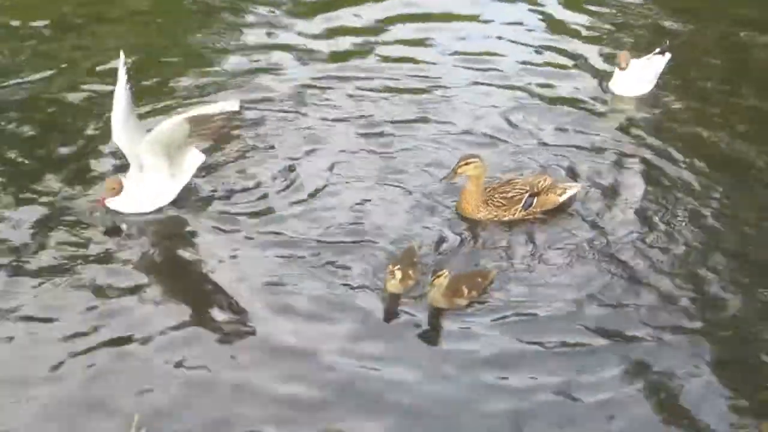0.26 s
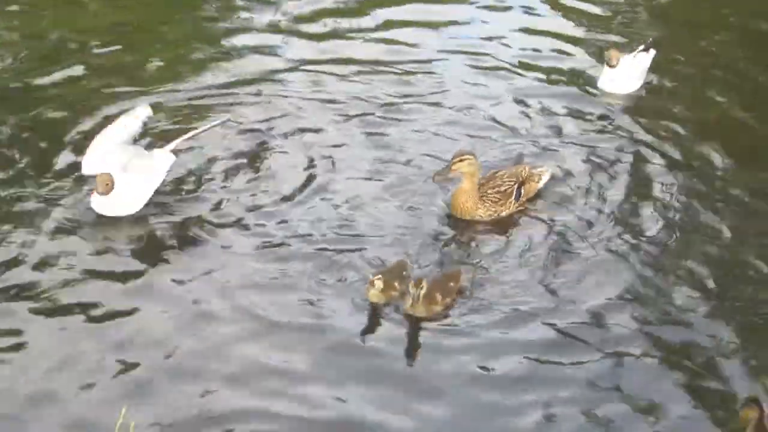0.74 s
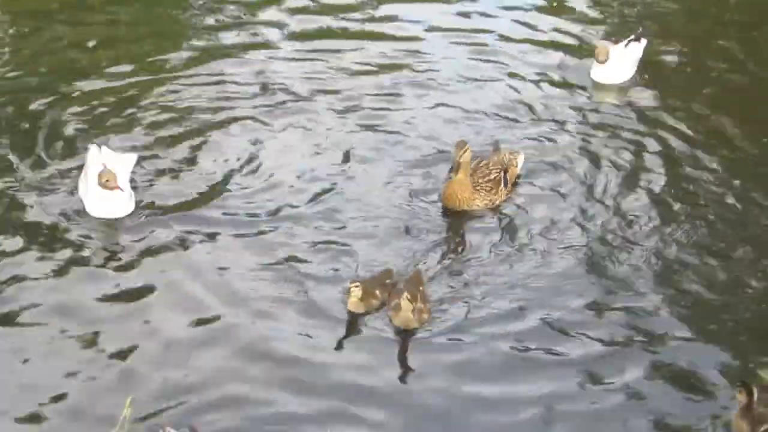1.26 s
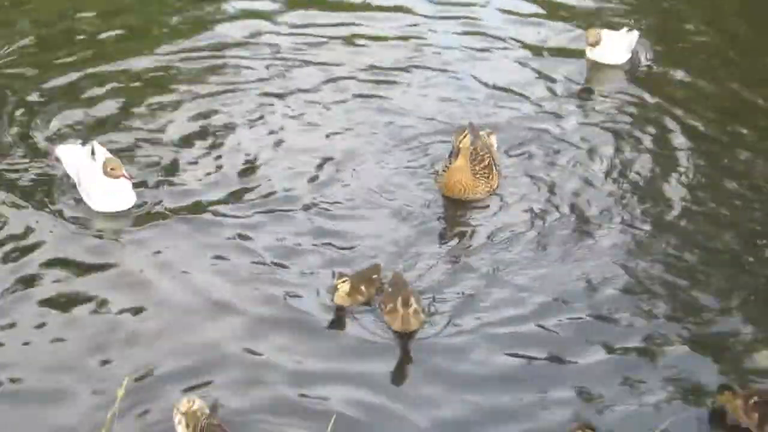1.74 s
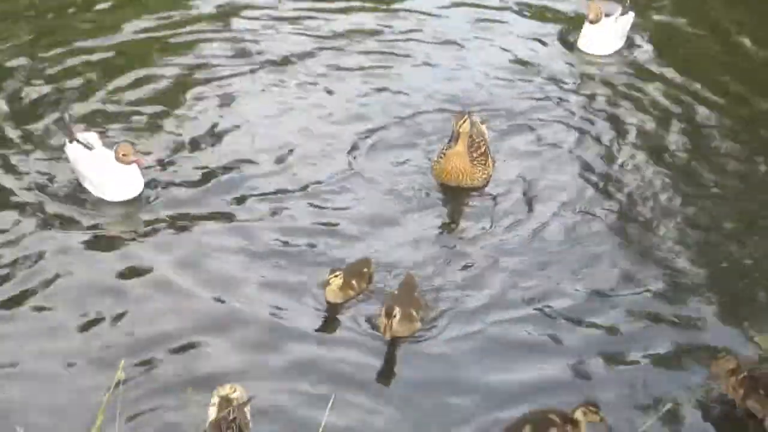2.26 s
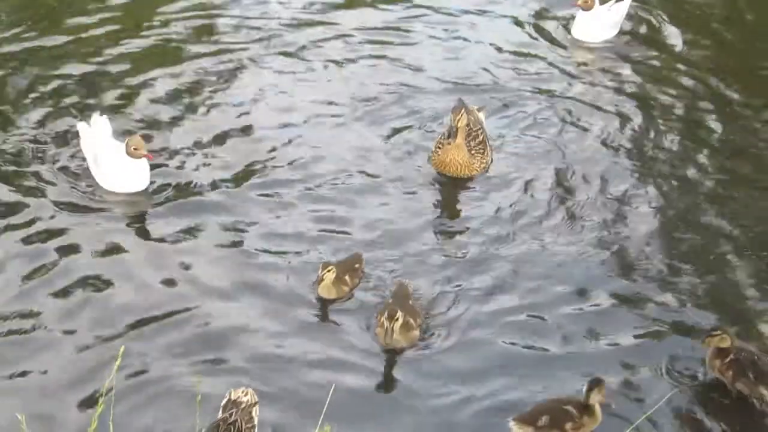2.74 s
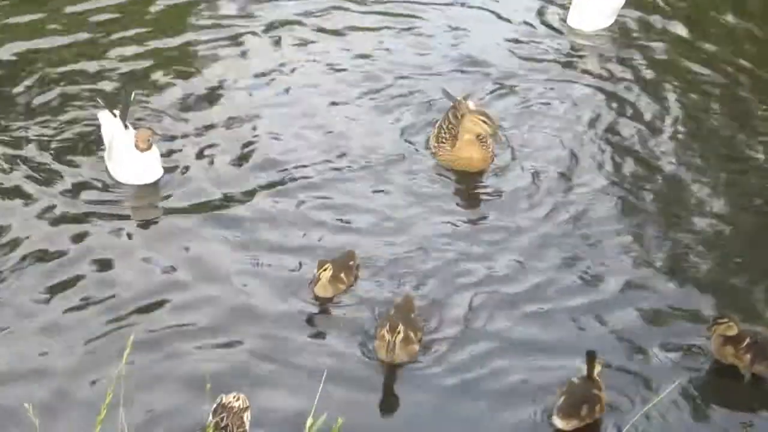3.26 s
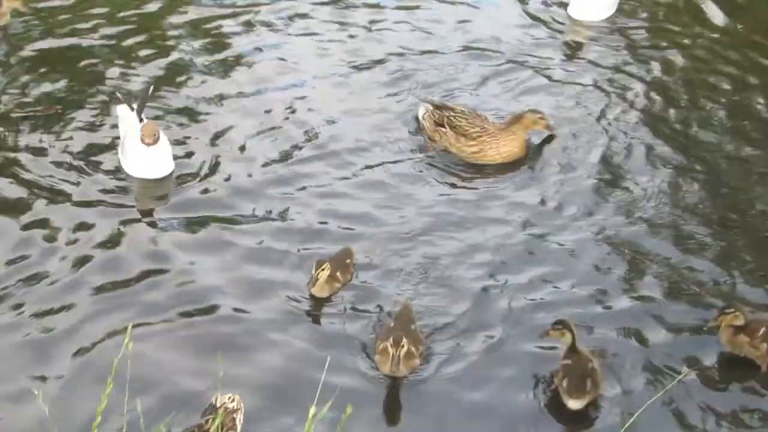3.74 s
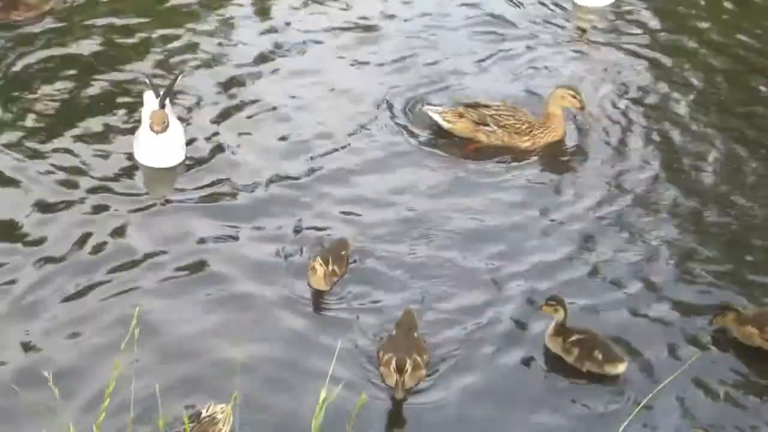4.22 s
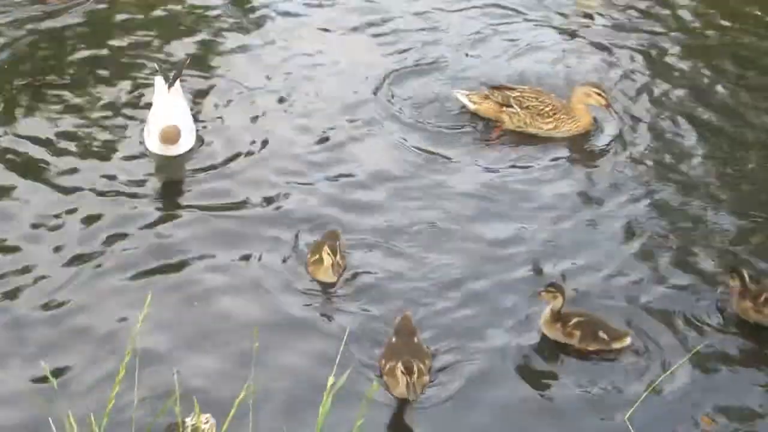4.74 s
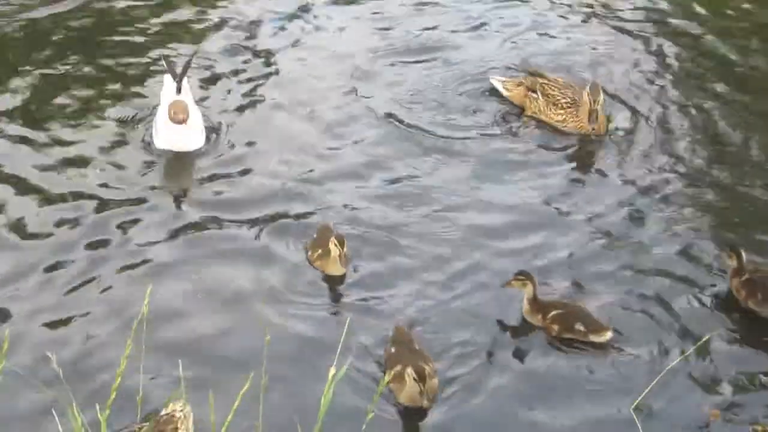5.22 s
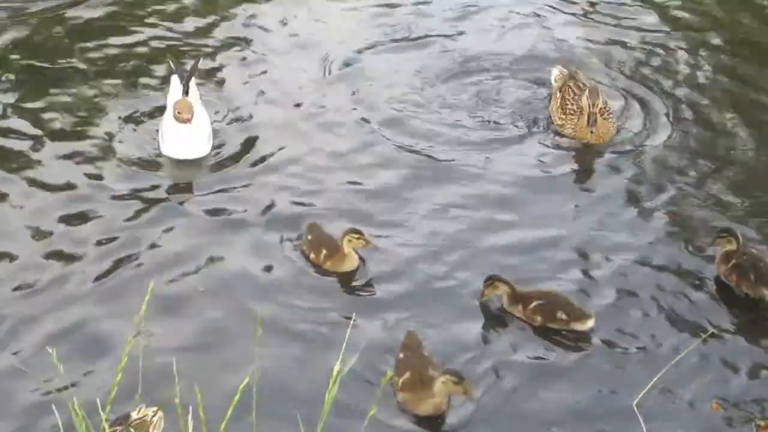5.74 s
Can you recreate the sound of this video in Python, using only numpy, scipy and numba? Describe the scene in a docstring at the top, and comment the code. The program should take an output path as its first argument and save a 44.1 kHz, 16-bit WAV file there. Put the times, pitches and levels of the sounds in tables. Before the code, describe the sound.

Ducks close by keep up a dense, low clucking chatter on a pond, with two clear quacks, small splashes and a soft outdoor rumble.

```python
"""On a pond bank, mallards and their ducklings crowd close to the microphones, with a few gulls among them.
Near and far ducks cluck in hums and rattling pulses that ring in throat and bill; two open-billed quacks stand out.
Gulls squawk in rough pulse tones and ducklings peep in gliding whistles; bills and feet stir the water in noise,
with sharp splats and rising drips. Behind lie a flock murmur, dull echoes and a low outdoor rumble in shaped noise.
Low thumps of wind strike the microphones midway and near the end, where gusts of a breeze join them."""
import sys
import numpy as np
from scipy import signal
from scipy.io import wavfile
from numba import njit

SR = 44100
rng = np.random.default_rng(int(sys.argv[2]) if len(sys.argv) > 2 else 0)


def unload_audio(sound):
    """Save the sound as a 16-bit wav file, at the path given as the first command line argument."""
    columns = np.transpose(np.atleast_2d(sound))
    # keep every value between -1 and 1, then stretch to whole-number steps
    steps = np.round(np.clip(columns, -1, 1) * 32767)
    wavfile.write(sys.argv[1], SR, steps.astype(np.int16))


N = 263718

# Levels in the tables are ahead of each layer's trim, placing and filtering.
# Clucks of the near ducks: (start [s], length [s], hum pitch [Hz], throat level [dB], throat resonance [Hz],
# hum re throat [dB], bill re throat [dB], direction [-1 left to 1 right])
NEAR_CLUCKS = [(0.047, .06, 307, -31.5, 2060, -6, -1, 0.18), (.16, 0.037, 339, -26.5, 2100, -9, -15, 0.88),
               (0.261, .042, 342, -29, 1580, -5.5, -2.5, 0), (0.417, 0.036, 305, -35, 1780, -5, -13, -0.57),
               (0.461, .032, 298, -35, 1320, -10, -27, -0.37),
               (.531, 0.051, 335.4, -25.5, 1920, -6.5, 0.5, -0.31),
               (0.56, 0.061, 299, -29.5, 2010, -16, 3, -0.37),
               (0.632, 0.033, 339.5, -35.5, 1950, -6, -5, -.8),
               (0.775, .031, 333, -38.5, 1980, -1, -19, -0.43),
               (0.896, .046, 313, -34.5, 1860, -7.5, -18, -0.65),
               (1.02, 0.067, 306, -31, 1620, -9, -2, -0.13),
               (1.083, 0.035, 347, -22.5, 1840, -12.5, -17, 0.53),
               (1.155, 0.051, 321, -34, 1690, -10, -25, .5), (1.199, 0.033, 299, -27.5, 1950, -8.5, -5, 0),
               (1.277, 0.052, 278, -34.5, 1640, -10, -9, -0.54),
               (1.352, 0.049, 383.3, -24, 2050, -11.5, -9.5, 0.5),
               (1.692, 0.059, 392, -28.5, 2080, -10.5, -13.5, .6),
               (1.763, 0.029, 335, -27.5, 2010, -15.5, -11.5, 0.73),
               (1.806, 0.045, 281, -36.5, 1630, -11, -9, -0.62),
               (1.875, .016, 297, -29, 1780, -28, -16, -0.077),
               (1.918, 0.063, 313, -35.5, 1690, -10.5, -26, 0.48),
               (2.08, 0.041, 315, -24.5, 1970, -11, -8, -0.076),
               (2.118, 0.023, 333, -22.5, 1860, -21, -15, -0.039),
               (2.22, 0.028, 290, -27.5, 1670, -18, -15, .1), (2.322, .014, 292, -36, 1620, -20, -11, .1),
               (2.371, 0.048, 327.3, -28.5, 1540, -5, -2.5, 0),
               (2.543, 0.025, 303, -38, 1940, -4.5, -21, -0.5),
               (2.592, 0.052, 311, -34.5, 2530, -13, -12, 0.42),
               (2.912, 0.035, 334, -27.5, 2050, -15.5, -24, .9),
               (2.959, 0.054, 314, -33, 1720, -13, -9, -0.24), (3.014, 0.065, 308, -38, 1520, -9, -7, 0.36),
               (3.082, 0.039, 269, -41.5, 1860, -5, -16, -1),
               (3.176, .072, 306.3, -49, 1750, 7, -13.5, -0.48),
               (3.301, 0.061, 318.4, -38.5, 1830, -1.5, 3, 0.25),
               (3.414, .048, 313, -33, 2640, -10.5, -17, 0.51),
               (3.536, 0.051, 302, -37, 1810, -6.5, -2, -0.56),
               (3.603, 0.077, 330, -28, 1620, -11, -11.5, 0.26),
               (3.868, 0.077, 326, -32, 2210, -7, -1.5, .2), (3.942, .07, 307, -37, 1600, -10, -8, 0.46),
               (4.145, .058, 339, -27, 2270, -10, -1.5, 0.26),
               (4.582, 0.08, 283, -41, 1710, -7.5, 0.5, -0.075),
               (4.833, .056, 340.6, -24, 2390, -12.5, -3, 0),
               (4.901, 0.069, 302, -28.5, 1790, -16.5, -6, -.1),
               (5.166, 0.084, 321, -28.5, 1750, -18, -16, 0.46),
               (5.384, 0.033, 334, -24, 1660, -14, -7.5, 0.91),
               (5.457, 0.073, 300, -24.5, 1800, -19, -5, -0.64), (5.575, 0.065, 348, -30, 1970, -6.5, 0, 0),
               (5.647, 0.044, 361, -26, 1600, -16.5, -5, 0.37),
               (5.763, 0.056, 288.5, -25, 1940, -17.5, -7, -0.76),
               (5.808, 0.054, 290, -31.5, 1630, -10, -1.5, 0.23)]
# Quacks: (start [s], attack [s], time to highest pitch [s], highest pitch [Hz], level [dB], fading [dB/s])
QUACK_CALLS = [(3.742, 0.017, .115, 360, -21.5, 25), (4.482, 0.011, .098, 375.3, -15.5, 106)]
# Gull squawks: (start [s], peak [s], end [s], pitch [Hz], level [dB], throat resonance [Hz],
# roughness [0-1], direction [-1 left to 1 right])
GULL_SQUAWKS = [(0.355, 0.385, .414, 1332, -30, 1900, 0.32, 0.084),
                (1.304, 1.343, 1.378, 832, -32, 1790, .5, 0.21),
                (2.62, 2.649, 2.68, 788, -21, 2780, 0.28, 0.52),
                (3.373, 3.405, 3.458, 559, -26, 2770, 0.13, 1)]
# Duckling peeps: (start [s], top [s], end [s], start pitch [Hz], top pitch [Hz], end pitch [Hz], level [dB])
DUCKLING_PEEPS = [(.112, .12, .165, 3500, 3560, 1800, -40), (.275, .315, .338, 3000, 3380, 2300, -44),
                  (.394, .432, .466, 3000, 3330, 2150, -38.5), (3.29, 3.303, 3.312, 3000, 3500, 3200, -40),
                  (4.296, 4.305, 4.316, 2400, 2500, 2350, -37)]
# Sharp splats of bills and feet: (time [s], level [dB])
WATER_SPLATS = [(0.373, -3), (0.496, -11.5), (0.947, -13), (2.836, -15), (3.325, -7), (3.581, -4),
                (4.146, -6.5), (4.526, -1), (5.125, -4)]
# Water drips: (time [s], bubble pitch at first [Hz], level [dB])
WATER_DRIPS = [(0.353, 1510, -26), (0.471, 1260, -32), (.826, 1390, -29), (.972, 1185, -28),
               (1.113, 1760, -32), (3.345, 730, -25.5), (3.749, 1840, -27.5), (3.987, 1320, -34)]
# Single thumps of wind on the microphones: (time [s], peak level [dB])
WIND_BUFFETS = [(3.06, -47), (3.19, -29), (4.991, -46), (5.033, -30), (5.127, -28.5), (5.297, -29),
                (5.534, -31), (5.875, -36)]
# Gusts of the breeze: (start [s], length [s], level [dB])
BREEZE_GUSTS = [(4.805, 0.38, -43), (5.219, 0.16, -44), (5.705, .28, -41.5)]

# Chatter of the distant flock: (time [s], level [dB])
FLOCK_CHATTER = [(0.0, -40.5), (0.17, -42.5), (0.4, -38), (0.83, -40), (1.22, -35), (1.45, -46.5),
                 (1.73, -39), (1.9, -35.5), (2.36, -38.5), (3.83, -32), (3.96, -42), (4.23, -37),
                 (4.71, -35.5), (5.2, -40), (5.68, -47.5), (5.98, -35)]
# How much the birds stir the water: (time [s], level [dB])
WATER_STIRRING = [(0.0, -53), (0.51, -53), (1.13, -45.5), (1.46, -56.5), (2.43, -53), (2.8, -50),
                  (3.66, -48), (4.33, -51), (4.73, -48.5), (5.98, -54)]
# Slow swell of the deep rumble: (time [s], level [dB])
DEEP_SWELL = [(0.0, -53), (1.23, -61), (1.47, -62), (2.0, -54.5), (2.92, -60), (3.1, -55), (4.7, -61.5)]

# Spectrum of the distant flock: (frequency [Hz], relative density [dB per Hz])
FLOCK_SPECTRUM = [(150, -49), (230, -21), (310, -3.5), (480, -10.5), (800, 1), (1300, 2), (1900, 2.5),
                  (2600, -8), (3600, -10), (6000, -20.5), (12000, -17.5)]
# Spectrum of the stirred water: (frequency [Hz], relative density [dB per Hz])
WATER_SPECTRUM = [(600, 3.5), (1500, 8), (3500, 3.5), (6000, 0), (10000, 2), (14000, -26)]
# Spectrum of wind at the microphones: (frequency [Hz], relative density [dB per Hz])
WIND_SPECTRUM = [(25, -16), (60, -8), (130, -4), (220, -6.5), (400, -21), (900, -37), (3000, -60)]
# Spectrum of the steady outdoor rumble: (frequency [Hz], relative density [dB per Hz])
RUMBLE_SPECTRUM = [(15, -46), (25, -36), (58, 3), (136, -33), (318, 2), (436, -25), (632, 4), (1600, -5.5),
                   (1820, -5), (2440, -5), (3010, -16), (10700, -20), (12900, -25), (14000, -37)]
# Spectrum of the swelling deep rumble: (frequency [Hz], relative density [dB per Hz])
DEEP_SPECTRUM = [(25, -24), (58, 5), (90, -11.5), (160, 3), (300, -7.5), (900, -31)]
# Left-right likeness of the surroundings: (frequency [Hz], correlation [-1 to 1])
STEREO_LIKENESS = [(30, 0.029), (80, 0.86), (160, 0.91), (300, 0.99), (700, 0.89), (1500, 0.59),
                   (3000, 0.44), (7000, -0.035), (13000, -0.62)]
# Resonances of a quacking duck besides the moving one: (frequency [Hz], width [Hz], level [dB])
QUACK_RESONANCES = [(1260, 105, 0), (2695, 164, -2.5), (3640, 530, -12.5), (5960, 2200, -18),
                    (9270, 1700, -19)]

CLUCK_ATTACK_SHARE = .38   # of a cluck's length
# pulse rate of a cluck of the usual length; shorter clucks rattle faster, by this power of their length
RATTLE_PER_S, USUAL_LENGTH_S, RATTLE_HURRY = 190, .048, .3
# a pinched throat chokes the hum and rings narrowly: width under a hum as loud as the throat, dB less hum that halves it
OPEN_WIDTH_HZ, PINCH_DB, WIDTH_RANGE_HZ = 1690, 9.5, (310, 1060)
BILL_HZ, BILL_SCATTER = 5345, .074   # the bill's resonance and the scale of its change from call to call
# far clucks re the flock; their hum and bill re the throat; then their ranges
FAR_CLUCK_DB, FAR_HUM_DB, FAR_BILL_DB = -2.5, -5.5, -12
FAR_PITCH_HZ, FAR_THROAT_HZ, FAR_LENGTH_S = (244.6, 332.6), (1470, 2340), (.025, .06)
QUACK_START_HZ, QUACK_THROAT_WIDTH_HZ = 270, 590
QUACK_LENGTH_S, QUACK_HOLD_S = .2, .12
QUACK_RISE_DB, QUACK_RELEASE_DB_PER_S = 38.5, 360
# as the bill opens the throat resonance climbs and the voice clears: (shut, open)
BILL_OPENS_S, QUACK_THROAT_HZ, QUACK_ROUGHNESS = .037, (1140, 1750), (.91, .26)
GUST_ATTACK_S, GUST_RELEASE_S = .045, .052
MURMUR_DB, WATER_DB, RUMBLE_DB, DEEP_DB, ECHO_DB = -4, 2.5, -47, 3, -12.5
CUTOFF_HZ = 13900


def cluck(start, length, pitch_hz, db, throat_hz, hum_db, bill_db, direction):
    """A low arching hum from the throat, with a dry rattle of pulses ringing in throat and bill."""
    rattle = RATTLE_PER_S * (USUAL_LENGTH_S / length) ** RATTLE_HURRY
    width_hz = np.clip(OPEN_WIDTH_HZ * 2 ** (hum_db / PINCH_DB), *WIDTH_RANGE_HZ)
    bill_hz = BILL_HZ * (1 + BILL_SCATTER * rng.uniform(-1.53, 1))
    u, envelope = swell(start, start + CLUCK_ATTACK_SHARE * length, start + length)
    arch = 1 - .3 * (2 * u - 1) ** 2

    clicks = pulses(rattle * arch ** .5, jitter=.16, shimmer_db=3.2)
    clicks[np.argmax(envelope)] += .35      # an added closing at the top of the effort
    source = windpipe(rasp(clicks, share=.36, puff_s=.0035))
    throat = formant(source, throat_hz, width_hz)
    throat = throat - from_db(-13) * formant(source, .63 * throat_hz, 296)
    bill = formant(source, bill_hz, 1310)
    bill = bill + from_db(-12) * formant(source, 9700, 1800)
    bill = bill + from_db(-1) * formant(source, 4480, 1300)

    hum_hz = pitch_hz * arch * (1 + .083 * drift(260, len(u)))
    phase = 2 * np.pi * np.cumsum(hum_hz) / SR
    tone = np.sin(phase) + from_db(-8) * np.sin(2 * phase) + from_db(-6) * np.sin(3 * phase)
    low_rattle = butter(source, [250, 900], "band")
    hum = rms_one(tone) + from_db(-3) * rms_one(low_rattle)

    voice = rms_one(throat * envelope) + from_db(bill_db - 3) * rms_one(bill * envelope)
    voice = voice + from_db(hum_db + 1.03) * rms_one(hum * envelope ** 1.16)
    return place(from_db(db) * voice, direction)


def clucking():
    """The ducks close to the microphones: a throat hum and rattle for every row of the table."""
    out = np.zeros((2, N))
    for row in NEAR_CLUCKS:
        add(out, row[0], cluck(*row))
    return from_db(.72) * out


def quack_shape(age, attack_s, top_s, top_hz, level_db, fade_db_per_s):
    """Pitch arches; the level rises, fades and is let go; the opening bill lifts the throat and clears the voice."""
    pitch = QUACK_START_HZ + (top_hz - QUACK_START_HZ) * np.sin(np.pi / 2 * age / top_s)
    db = level_db - QUACK_RISE_DB * np.exp(-age / attack_s) - fade_db_per_s * age
    db = db - QUACK_RELEASE_DB_PER_S * np.maximum(age - QUACK_HOLD_S, 0)
    opening = 1 - np.exp(-(age / BILL_OPENS_S) ** 2)
    throat_hz = np.interp(opening, [0, 1], QUACK_THROAT_HZ)
    rough = np.interp(opening, [0, 1], QUACK_ROUGHNESS)
    return pitch, db, throat_hz, rough


def quacks():
    """Open-billed quacks: every second cycle closes hard, so half-pitch lines fill the throat resonance."""
    out = np.zeros((2, N))
    age = np.arange(0, QUACK_LENGTH_S, 1 / SR)
    for start, *shape in QUACK_CALLS:
        pitch, db, throat_hz, rough = quack_shape(age, *shape)
        clicks = pulses(pitch * (1 + .05 * rough * drift(150, len(age))), jitter=.008, shimmer_db=2)
        clicks = clicks * np.where(np.cumsum(clicks > 0) % 2, 1, .25)
        source = windpipe(rasp(clicks, np.clip(rough, 0, .6) ** 1.5, puff_s=.002), feedback=.42)
        throat = source
        angle, radius = 2 * np.pi * throat_hz / SR, np.exp(-np.pi * QUACK_THROAT_WIDTH_HZ / SR)
        for _ in range(2):
            throat = moving_resonance(throat, angle, radius)
        for hz, width_hz, gain_db in QUACK_RESONANCES:
            throat = throat + from_db(gain_db) * formant(source, hz, width_hz)
        phase = 2 * np.pi * np.cumsum(pitch) / SR
        hum = from_db(-14) * np.sin(phase) + from_db(-5) * np.sin(2 * phase)
        # the hum rises and falls less than the throat
        voice = from_db(db) * rms_one(throat) + from_db(.55 * db - 17) * hum
        add(out, start, place(voice, .068))
    return from_db(1.4) * out


def squawks():
    """Gulls' short harsh notes: a high arching pulse tone through a wide-open bill."""
    out = np.zeros((2, N))
    for start, peak, end, pitch_hz, db, throat_hz, rough, direction in GULL_SQUAWKS:
        u, envelope = swell(start, peak, end)
        clicks = pulses(pitch_hz * (1 - .1 * (2 * u - 1.1) ** 2), jitter=.025, shimmer_db=3.5)
        source = rasp(clicks, np.clip(rough, 0, .4), puff_s=.0005)
        voice = formant(source, throat_hz, 1150)
        for hz, width_hz, gain_db in [(1450, 700, -9), (3160, 750, -37), (6000, 2100, -13), (8400, 3300, -14.5)]:
            voice = voice + from_db(gain_db) * formant(source, hz, width_hz)
        add(out, start, place(from_db(db) * rms_one(voice * envelope ** 1.66), direction))
    return out


def peeps():
    """Ducklings' thin whistles that arch and drop away, with an octave that grows through the call."""
    out = np.zeros((2, N))
    for start, top, end, start_hz, top_hz, end_hz, db in DUCKLING_PEEPS:
        u, envelope = swell(start, (top + end) / 2, end)
        from_top = np.interp(u, [0, (top - start) / (end - start), 1], [-1, 0, 1])
        outer_hz = np.where(from_top < 0, start_hz, end_hz)
        hz = top_hz + (outer_hz - top_hz) * np.abs(from_top) ** 2.4
        phase = 2 * np.pi * np.cumsum(hz * (1 + .011 * drift(700, len(u)))) / SR
        whistle = np.sin(phase) + u ** 2 * np.sin(2 * phase)
        add(out, start, place(from_db(db - 1.5) * envelope ** .4 * whistle, .1))
    return out


def stirred_water(water_db):
    """Water stirred by the birds: flickering noise under a fine crackle of random grains."""
    strength = from_db(3.3 * np.minimum(rng.exponential(1, (2, N)), 4))
    grains = (rng.random((2, N)) < 1300 / SR) * rng.standard_normal((2, N)) * strength
    crackle = rms_one(butter(grains, [2500, 11500], "band"))
    wash = banded_noise(WATER_SPECTRUM, patchy_db=3, flicker_rate=70)
    return from_db(water_db) * (from_db(6.5) * wash + from_db(2.5) * crackle)


def splats():
    """Bills and feet slap the water: bursts of treble noise that die within milliseconds."""
    out = np.zeros((2, N))
    t = np.arange(2200) / SR
    envelope = np.exp(-t / .0027) * (1 - np.exp(-t / .0025))
    for start, db in WATER_SPLATS:
        burst = rng.standard_normal((2, len(t))) * envelope
        add(out, start, from_db(db - 6) * butter(burst, [3500, 11500], "band"))
    return out


def drips():
    """Drips: each bubble rings as a fading sine that rises in pitch."""
    out = np.zeros((2, N))
    t = np.arange(2200) / SR
    envelope = np.exp(-t / .0078) * (1 - np.exp(-t / .0004))
    for start, hz, db in WATER_DRIPS:
        bubble = np.sin(2 * np.pi * hz * t * (1 + 7 * t)) * envelope
        add(out, start, place(from_db(db) * bubble, 0))
    return out


def wind(t):
    """Gusts of lumpy low turbulence at the microphones, stronger on the left, with a few single thumps."""
    force = 0
    for start, length, db in BREEZE_GUSTS:
        rise, fall = (t - start) / GUST_ATTACK_S, (start + length - t) / GUST_RELEASE_S
        force = force + from_db(db) * np.clip(np.minimum(rise, fall), 0, 1)
    out = force * banded_noise(WIND_SPECTRUM, patchy_db=1.5, flicker_rate=32)
    age = np.arange(2600) / SR
    for start, peak_db in WIND_BUFFETS:
        thump = butter(rng.standard_normal(len(age)) * np.exp(-age / .0063), [70, 420], "band")
        add(out, start - .003, from_db(peak_db) * thump / np.abs(thump).max())
    return out * from_db([[2.5], [-7]])


def far_clucking(flock_db, count=60):
    """Ducks farther along the bank keep up the same chatter: random clucks that follow the flock's level."""
    out = np.zeros((2, N))
    for k, (when, long, size, colour, side) in enumerate(rng.random((count, 5))):
        start = (k + when) / count * N / SR
        db = flock_db[min(int(start * SR), N - 1)] + FAR_CLUCK_DB
        length = np.interp(long, [0, 1], FAR_LENGTH_S)
        pitch_hz = np.interp(size, [0, 1], FAR_PITCH_HZ)
        throat_hz = np.interp(colour, [0, 1], FAR_THROAT_HZ)
        direction = 1.48 * side - .7
        add(out, start, cluck(start, length, pitch_hz, db, throat_hz, FAR_HUM_DB, FAR_BILL_DB, direction))
    return out


def flock_murmur(flock_db):
    """The distant flock blurs into flickering noise that follows its chatter."""
    return from_db(flock_db + MURMUR_DB) * banded_noise(FLOCK_SPECTRUM, patchy_db=2, flicker_rate=55)


def banks(x, t60=.2, count=40):
    """Sparse dull echoes from the banks and trees."""
    delays = rng.uniform(.008, .22, (2, count))
    echoes = np.zeros((2, SR))
    for side in (0, 1):
        strength = from_db(-60 * delays[side] / t60) * rng.standard_normal(count)
        echoes[side, (delays[side] * SR).astype(int)] = strength
    echoes = echoes + .5 * echoes[::-1]
    echoes /= np.linalg.norm(echoes, axis=1, keepdims=True)
    return signal.fftconvolve(butter(x, [600, 4500], "band", order=1), echoes, axes=1)[:, :N]


def outdoor_rumble():
    """The outdoor background: noise weighted to the lows, its bands flickering unevenly."""
    return from_db(RUMBLE_DB) * banded_noise(RUMBLE_SPECTRUM, patchy_db=4, flicker_rate=12)


def deep_rumble(t):
    """Deep noise that swells slowly, 7 dB weaker on the right."""
    db = DEEP_DB + in_time(DEEP_SWELL, t)
    return from_db(db + [[0], [-7]]) * banded_noise(DEEP_SPECTRUM, patchy_db=3, flicker_rate=27)


def pulses(rate, jitter, shimmer_db):
    """One click for each closing of the syrinx, uneven in time and strength."""
    phase = np.cumsum(rate * np.exp(jitter * drift(260, len(rate)))) / SR + rng.random()
    closings = np.diff(np.floor(phase), prepend=np.floor(phase[0]))
    return closings * from_db(shimmer_db * drift(399.4, len(rate)))


def rasp(clicks, share, puff_s):
    """Each click comes with a short puff of turbulent air that swells and fades around it, a little late."""
    k = np.exp(-1 / (puff_s * SR))
    gate = signal.filtfilt([1 - k], [1, -k], clicks, padtype=None)
    puff = np.roll(gate, int(.4 * puff_s * SR)) * rng.standard_normal(16384)[:len(clicks)]
    share = np.clip(share, 0, 1)
    return np.sqrt(1 - share) * rms_one(clicks) + np.sqrt(share) * rms_one(puff)


def windpipe(x, lags_s=(.00031, .00047, .00073), feedback=.5):
    """Reflections along the windpipe (all-pass) spread each pulse over a few milliseconds without colouring it."""
    g = np.clip(feedback, 0, .7)
    for lag in lags_s:
        taps = np.zeros(int(lag * rng.uniform(.8, 1.25) * SR) + 2)
        taps[[0, -1]] = 1, -g
        x = signal.lfilter(taps[::-1], taps, x)
    return x


def resonate(x, hz, width_hz):
    """Two-pole resonance with gain 1 on top."""
    r = np.exp(-np.pi * abs(width_hz) / SR)
    feedback = [1, -2 * r * np.cos(2 * np.pi * hz / SR), r * r]
    return signal.lfilter(np.array([1, 0, -1]) * (1 - r * r) / 2, feedback, x)


def formant(x, hz, width_hz):
    """Two like resonances in a row: a slower ring-up and dark valleys on both sides."""
    return resonate(resonate(x, hz, 1.2 * width_hz), hz, 1.2 * width_hz)


@njit
def moving_resonance(x, angle, r):
    """A two-pole resonance whose centre glides."""
    y = np.zeros(len(x))
    for i in range(2, len(x)):
        drive = (1 - r * r) / 2 * (x[i] - x[i - 2])
        y[i] = drive + 2 * r * np.cos(angle[i]) * y[i - 1] - r * r * y[i - 2]
    return y


def swell(start, peak, end):
    """Progress 0-1 through a call, and its rounded envelope of unit power."""
    t = np.linspace(start, max(end, start + .006), max(int((end - start) * SR), 260))
    rise_fall = np.interp(t, [t[0], np.clip(peak, t[9], t[-9]), t[-1]], [0, 1, 0])
    return np.linspace(0, 1, len(t)), rms_one(np.sin(np.pi / 2 * rise_fall) ** .9)


def place(x, direction, lag_s=.00027, pan_db=4.0, bias_db=1.5, scatter=.82):
    """The far microphone hears a call later and softer; the bank scatters its treble differently to each."""
    x = np.pad(x, (0, 400))
    n, sides = np.arange(len(x)), np.array([[-1], [1]])
    direct = np.array([np.interp(n + s * direction * lag_s * SR / 2, n, x) for s in (-1, 1)])
    paths = rng.standard_normal((2, 200)) * np.exp(-np.arange(200) / 40)
    paths /= np.linalg.norm(paths, axis=1, keepdims=True)
    treble = butter(x, 3300, "high", order=1)
    scattered = signal.fftconvolve(treble[None], paths, axes=1)[:, :len(x)]
    balance = from_db(sides * (bias_db + pan_db * direction) / 2)   # the bias leans everything right
    return (butter(direct, 9000, "low", order=1) + scatter * scattered) * balance


def banded_noise(spectrum, patchy_db, flicker_rate):
    """Half-octave bands of stereo noise of unit power, flickering partly together, each with its own likeness."""
    out, edges = 0, 22 * 2 ** np.arange(0, 9.6, .5)
    white = rng.standard_normal((2, 2, N))   # neighbouring bands use different noise
    together = drift(flicker_rate, N)
    for k, (low, high) in enumerate(zip(edges, edges[1:])):
        mid, side = butter(white[k % 2], [low, high], "band")
        hz = np.sqrt(low * high)
        alike = np.clip(at_hz(STEREO_LIKENESS, hz), -1, 1)
        flicker_db = patchy_db * (1.07 * together + drift(flicker_rate, N))
        gain = from_db(at_hz(spectrum, hz) + flicker_db)
        out = out + gain * (np.sqrt(1 + alike) * mid + np.sqrt(1 - alike) * side * [[1], [-1]])
    return rms_one(out)


def drift(rate, size):
    """Random values of unit spread, drawn rate times a second and joined by straight lines."""
    knots = rng.standard_normal(4000)
    return np.interp(np.arange(size) * rate / SR, np.arange(len(knots)), knots)


def butter(x, hz, kind, order=2):
    """Butterworth filter."""
    sos = signal.butter(order, np.clip(hz, 10, .45 * SR), kind, fs=SR, output="sos")
    return signal.sosfilt(sos, x)


def from_db(db):
    """Decibels to gain."""
    return 10 ** (np.asarray(db) / 20)


def rms_one(x):
    """Scale to unit power."""
    return x / np.sqrt(np.mean(x ** 2) + 1e-20)


def in_time(rows, t):
    """The level of a curve at times t."""
    seconds, level_db = np.transpose(rows)
    return np.interp(t, seconds, level_db)


def at_hz(points, hz):
    """Read a spectrum on a log-frequency axis."""
    frequency, value = np.transpose(points)
    return np.interp(np.log(hz), np.log(frequency), value)


def add(out, start, sound):
    """Mix a sound in at its time."""
    i = max(0, int(start * SR))
    out[..., i:i + sound.shape[-1]] += sound[..., :max(0, N - i)]


def scene():
    """Birds and stirred water in front of the distant flock, the echoes and the rumble."""
    t = np.arange(N) / SR
    flock_db = in_time(FLOCK_CHATTER, t)
    birds = clucking() + quacks() + squawks() + peeps() + far_clucking(flock_db)
    pond = stirred_water(in_time(WATER_STIRRING, t) + WATER_DB) + splats() + drips()
    pond = pond * from_db([[-1.2], [1.2]])   # the water leans right
    background = flock_murmur(flock_db) + from_db(ECHO_DB) * banks(birds) + outdoor_rumble() + deep_rumble(t)
    return birds + pond + wind(t) + background


def record(dry):
    """The microphones' signal with its top cut steeply by an elliptic low-pass."""
    return signal.sosfilt(signal.ellip(10, .3, 80, CUTOFF_HZ, fs=SR, output="sos"), dry)


dry = scene()
out = record(dry)
unload_audio(out)
```